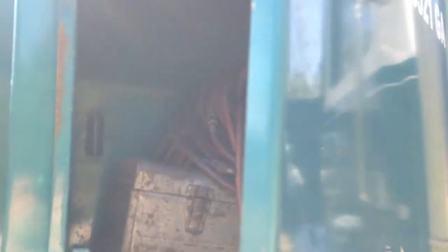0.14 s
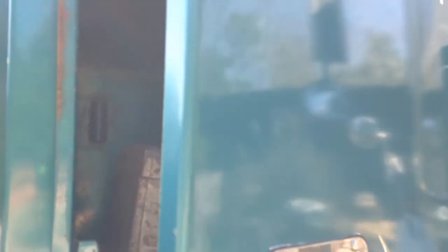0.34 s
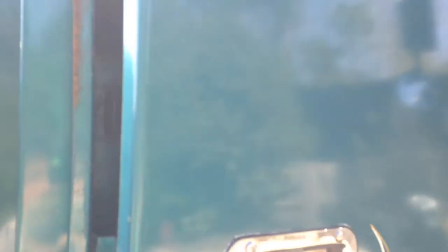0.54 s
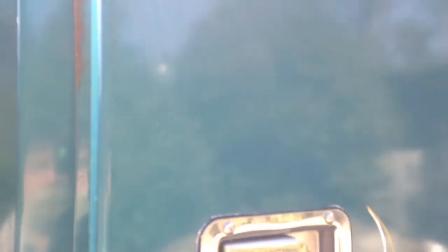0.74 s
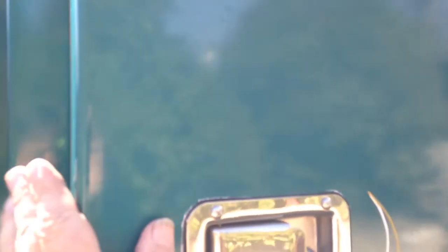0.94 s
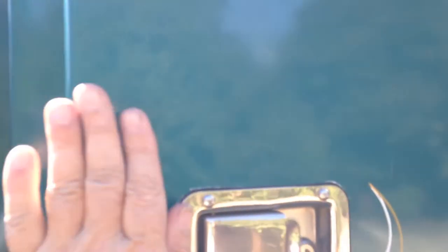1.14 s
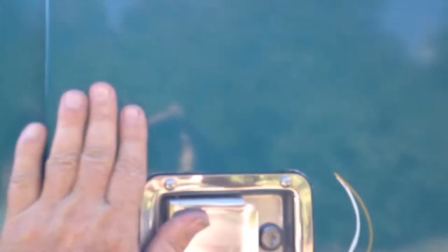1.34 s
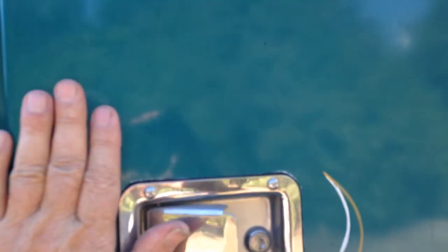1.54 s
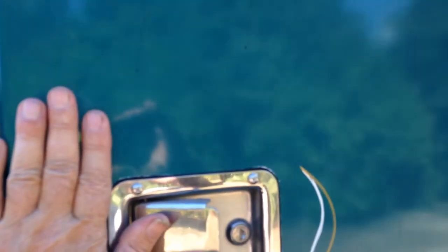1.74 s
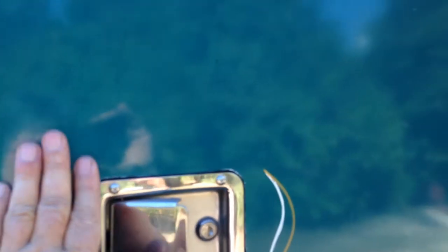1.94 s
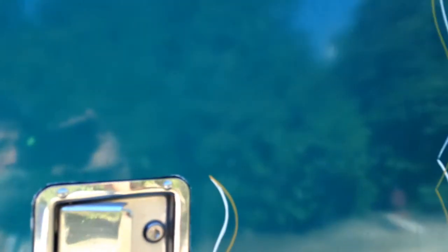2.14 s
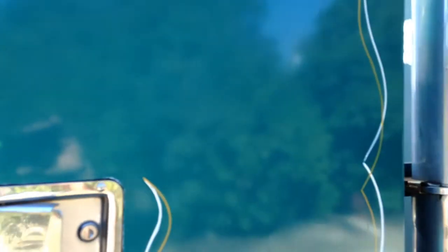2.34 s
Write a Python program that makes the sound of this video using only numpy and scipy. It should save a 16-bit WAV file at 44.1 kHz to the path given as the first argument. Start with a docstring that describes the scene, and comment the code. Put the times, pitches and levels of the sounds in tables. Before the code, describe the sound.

Metal compartment door on a truck slams shut: sharp knock, brief latch squeal, heavy hollow bang

```python
"""Outdoors, close to a truck, a steel compartment door is pushed shut by hand over faint shaped noise.
It comes free with a sharp knock and a smaller tick; grainy noise swells tick and rub as it swings and after.
The latch bolt squeals over its striker in two unsteady tones with overtones and combination tones.
The slam is a quick run of blows: bursts of decaying noise for the steel box's boom and long rumble,
with decaying sines for its panels and bolt."""
import sys
import numpy as np
from scipy import signal
from scipy.fft import rfft, irfft, next_fast_len
from scipy.io import wavfile

SR = 44100
rng = np.random.default_rng(int(sys.argv[2]) if len(sys.argv) > 2 else 0)


def file_out(sig):
    """Save sig as 16-bit WAV at sys.argv[1]."""
    # one column per channel
    cols = np.atleast_2d(sig).T
    # limit, then scale
    lim = np.clip(cols, -1, 1)
    pcm = np.round(lim * 32767).astype(np.int16)
    wavfile.write(sys.argv[1], SR, pcm)


N = 109323
TIME = np.arange(N) / SR
STEP = 16   # noise levels are set every STEP samples
SLOW_TIME = TIME[::STEP]
BANDS_HZ = 31.25 * 2 ** (np.arange(28) / 3)   # third-octave centres
ATTACK_S = 0.00074


def from_db(db):
    """Level to amplitude: 20 dB is a factor of ten."""
    return 10 ** (np.asarray(db) / 20)


def rms_one(x):
    """Normalisation: scale to unit mean power."""
    return x / np.sqrt(np.mean(x ** 2) + 1e-20)


def per_band(rows):
    """Spectral interpolation: columns of a frequency table read at the band centres on a log axis."""
    hz, *columns = np.transpose(rows)
    return [np.interp(np.log(BANDS_HZ), np.log(hz), column)[:, None] for column in columns]


def smooth_chance(chance, pole):
    """Low-pass filtering: a double pole smooths a random sequence."""
    return signal.lfilter([1], [1, -2 * pole, pole * pole], chance)


def drift(hz):
    """Random modulation: low-passed chance of unit RMS, with its corner near hz."""
    pole = np.exp(-2 * np.pi * hz * STEP / SR)
    slow = smooth_chance(rng.standard_normal(2 * len(SLOW_TIME)), pole)
    settled = slow[len(SLOW_TIME):]
    return np.interp(TIME, SLOW_TIME, rms_one(settled))


def dying(age, t60):
    """Exponential damping: 60 dB down after t60 seconds, held at 120 dB down."""
    return np.exp(-np.log(1000) * np.minimum(age / t60, 2))


def ring(modes, start):
    """Modal superposition: one blow starts damped sines, each with a pitch, peak dB and t60."""
    age = TIME[:N - int(start * SR)]
    out = sum(from_db(db) * np.sin(2 * np.pi * hz * age) * dying(age, t60) for hz, db, t60 in modes)
    return np.pad(out, (N - len(age), 0))


def shaped_noise(power, ripple_db=0):
    """Filtered noise: third-octave bands follow a power, coloured by cavity and narrow resonances."""
    # Resonances of the open steel box, colouring the noise within each band.
    # Each row: centre in Hz, half-width in Hz, boost in dB.
    cavity = [(38, 6.6, 8.5), (72.2, 7, 9.5), (98, 8, 6), (152, 4.5, 7), (189, 6.6, 8), (216, 6.6, 9),
              (342.9, 71, 5), (434, 6.7, 3.5), (507.7, 24, 8.5), (571.2, 8.9, 6.5), (669.6, 32, 8),
              (1200, 35, 4), (1279, 19, 3.5), (1884, 9.5, 5.5), (1890, 18, 4), (2850, 130, 2),
              (5270, 250, 1), (6900, 720, 1.5)]
    ripple_width_hz = 30
    size = next_fast_len(N + SR // 4)   # the extra lead lets the filters settle
    hz = np.fft.rfftfreq(size, 1 / SR)
    # steel rings more at some pitches than at others, fully so above 1 kHz
    chance = rng.standard_normal(len(hz))
    ripple = rms_one(smooth_chance(chance, np.exp(-hz[1] / ripple_width_hz)))
    ripple = ripple * np.minimum(hz / 1000, 1)
    cavity_db = sum(db / (1 + ((hz - centre) / width) ** 2) for centre, width, db in cavity)
    spectra = rfft(rng.standard_normal((2, size)))
    coloured = irfft(spectra * from_db(cavity_db + ripple_db * ripple), size)
    edge = 2 ** (1 / 6)
    out = np.zeros(N)
    for k, centre in enumerate(BANDS_HZ):
        band_pass = signal.butter(2, [centre / edge, centre * edge], "band", fs=SR, output="sos")
        band = signal.sosfilt(band_pass, coloured[k % 2])[-N:]   # neighbours use separate noises
        out += band * np.repeat(np.sqrt(power[k]) / band.std(), STEP)[:N]
    return out


def clatter(power):
    """High modal density: rippled noise for steel, flickering in level as loose parts rattle."""
    ripple_db, clatter_db, clatter_hz = 2.5, 0.5, 111
    return shaped_noise(power, ripple_db) * from_db(clatter_db * drift(clatter_hz))


def blow_power(blow, rings, attack_s):
    """Impact excitation: a crack and decaying rings set each band's power; the lows rise later."""
    # Where a blow's colour is set: bass up to the first, middle at the second, treble from the third, in Hz.
    colour_hz = [1000, 1200, 4000]
    crack_t60_s, attack_cycles = 0.04, .6
    start, *colour_db, crack_db = blow
    age = SLOW_TIME[SLOW_TIME > start] - start
    strength_db, = per_band(list(zip(colour_hz, colour_db)))
    # the crack takes the first ring's spectrum
    crack = from_db(per_band(rings[0])[0] + crack_db) * dying(age, crack_t60_s)
    decay = crack ** 2
    for db, t60 in map(per_band, rings):
        decay = decay + (from_db(db) * dying(age, t60)) ** 2
    rise = 1 - np.exp(-age / (attack_s + attack_cycles / BANDS_HZ[:, None]))
    power = decay * (from_db(strength_db) * rise) ** 2
    return np.pad(power, ((0, 0), (len(SLOW_TIME) - len(age), 0)))


def air():
    """Broadband background: faint shaped noise whose lows and treble change level separately."""
    # Basic spectrum. Each row: frequency in Hz, third-octave level in dB before the level changes.
    spectrum = [(30, -88.5), (70, -74.5), (120, -73), (230, -77), (350, -69), (520, -78), (850, -75.5),
                (1300, -73.5), (1900, -77.5), (2800, -76.5), (4200, -79), (6800, -76.5), (10000, -83),
                (15000, -79)]
    # Level changes. Each row: time in seconds, change in dB of the lows, change in dB of the treble.
    changes = [(0, 12, 14), (.15, 12.5, 7), (.33, 13, 2.5), (.6, 2.5, 9), (.8, 1, 8), (1.05, -4, 5.5),
               (1.2, 2, -1.5), (1.33, 7, 10), (1.6, 7.5, 4), (1.7, 5, -10), (1.95, -10, -2), (2.15, 6, -10),
               (2.3, 12.5, -3), (2.48, 8.5, -4.5)]
    split_hz = 3200
    s, low_db, high_db = np.transpose(changes)
    treble = (1 / (1 + (split_hz / BANDS_HZ) ** 2))[:, None]
    low_change_db = (1 - treble) * np.interp(SLOW_TIME, s, low_db)
    high_change_db = treble * np.interp(SLOW_TIME, s, high_db)
    level_db = per_band(spectrum)[0] + low_change_db + high_change_db
    return shaped_noise(from_db(level_db) ** 2)


def rubs():
    """Sliding friction: brief grainy noise swells, Gaussian in time and in log frequency."""
    # Hinge ticks, hand rubs and the door's low shove. Each row: peak time in seconds, level in dB
    # before the grain, rise in seconds, fall in seconds, centre in Hz, width in octaves.
    touches = [(.103, -43.5, 0.0068, 0.016, 10900, 1.2), (0.194, -40, 0.01, 0.0096, 2670, 0.83),
               (.47, -52, 0.019, 0.011, 3020, 0.75), (.615, -54, 0.0024, 0.01, 6500, 0.17),
               (.652, -55.5, 0.0044, 0.03, 4660, 0.63), (0.776, -50, 0.0042, .015, 3900, 0.83),
               (.86, -54.5, .008, 0.0074, 7360, 0.86), (0.9409, -49.5, .0012, 0.0032, 1184, 0.13),
               (.963, -54, .002, .003, 8500, .6), (0.975, -53.5, 0.00055, 0.019, 6000, 0.68),
               (1.072, -58, .001, 0.0091, 9100, 0.67), (1.135, -58.5, 0.0045, 0.01, 3420, 1.8),
               (1.262, -59, 0.019, 0.013, 9500, 0.4), (1.286, -53.5, 0.0053, .006, 9400, 0.3),
               (1.426, -31, 0.0064, .02, 129.6, 0.65), (1.737, -64.5, .002, 0.0036, 7800, .8),
               (2.09, -59.5, 0.044, 0.021, 12000, 0.51)]
    grain_db, grain_hz = 3, 259
    power = 0
    for peak_s, db, rise_s, fall_s, centre_hz, octaves in touches:
        colour = np.exp(-.5 * (np.log2(BANDS_HZ / centre_hz) / octaves) ** 2)
        distance = np.maximum((peak_s - SLOW_TIME) / rise_s, (SLOW_TIME - peak_s) / fall_s)
        swell = np.exp(-np.minimum(distance ** 2, 20))
        power = power + np.outer(colour / colour.sum(), from_db(db) ** 2 * swell)
    return shaped_noise(power) * from_db(grain_db * drift(grain_hz))


def squeal_tone(rows):
    """Stick-slip oscillation: phase and gain of one tone, unsteady in pitch and level."""
    jitter, flutter_db, flutter_hz = 0.0029, 1, 251.7   # jitter is a fraction of the pitch
    s, hz, db = np.transpose(rows)
    pitch = np.interp(TIME, s, hz) * (1 + jitter * drift(flutter_hz))
    phase = 2 * np.pi * np.cumsum(pitch) / SR
    gain = from_db(np.interp(TIME, s, db) + flutter_db * drift(flutter_hz))
    sounding = (TIME > s[0]) * (TIME < s[-1])
    return phase, gain * sounding


def squeal():
    """Stick-slip and intermodulation: the bolt's two tones, their combination tones and a scrape."""
    # The two tones. Each row: time in seconds, pitch in Hz, level in dB before flutter and mix.
    high_tone = [(1.30, 3800, -72), (1.333, 3700, -65), (1.348, 3780, -47.5), (1.367, 3780, -33),
                 (1.385, 3810, -33.5), (1.392, 3610, -32), (1.402, 3616, -25), (1.418, 3630, -30.5),
                 (1.428, 3570, -54.5)]
    low_tone = [(1.365, 2786, -66), (1.375, 2850, -40), (1.385, 2720, -41), (1.392, 2730, -26),
                (1.402, 2700, -29), (1.412, 2560, -34.5), (1.419, 2698, -26.5), (1.429, 2485, -38.5)]
    # Partials. Each row: multiple of the high tone, multiple of the low tone.
    multiples = [(1, 0), (0, 1), (2, 0), (0, 2), (1, 1), (2, -1), (-1, 2), (1, 2), (2, 1), (0, 3), (3, 0),
                 (1, 3), (2, 2)]
    # Level of each partial, in dB relative to its tone (to the weaker one where both mix).
    partial_db = [-1.5, -1.5, -9, -12, -6, -15, -23, -12.5, -17.5, -19, -26, -22.5, -19.5]
    scrape_db = -11.5
    high, high_gain = squeal_tone(high_tone)
    low, low_gain = squeal_tone(low_tone)
    out = from_db(scrape_db) * low_gain * rng.standard_normal(N)
    for (m, n), db in zip(multiples, partial_db):
        if m and n:
            gain = np.minimum(high_gain, low_gain)
        else:
            gain = high_gain if m else low_gain
        out = out + np.sqrt(2) * from_db(db) * gain * np.sin(m * high + n * low)   # levels are RMS
    return out


def knocks():
    """Impact and reverberation: a steel knock echoes in the open box, then a smaller tick."""
    # The door coming free. Each row: start in seconds, then bass, middle, treble and crack in dB.
    blows = [(.0592, 2, 4, 6, 8), (.2168, 6, 7.5, -1, -5)]
    # The knock's dense ring, its echo in the box and the tick's narrower ring.
    # Each row: frequency in Hz, third-octave level in dB before the blow's colour, t60 in seconds.
    knock_ring = [(35, -57, 0.2), (102, -45.5, 0.2), (250, -47, .45), (710, -41, 0.34), (1200, -36, 0.093),
                  (1900, -42, .18), (2600, -29.5, 0.21), (3280, -23, 0.12), (4800, -28, 0.12),
                  (6500, -35.5, 0.15), (9560, -40.5, 0.095), (14050, -42, .13)]
    knock_tail = [(35, -75.5, 1), (100, -56.5, 1.8), (240, -56.5, 2.1), (338, -52.5, 1.4), (500, -55, 0.7),
                  (704, -37.5, .9), (970, -54, 0.89), (1300, -50, 1.3), (1900, -53.5, .9),
                  (3000, -57, 0.86), (4000, -66, .7), (5200, -51.5, .9), (8000, -70, .6),
                  (13360, -70.5, .5)]
    tick_ring = [(100, -75, .2), (1800, -53, 0.28), (2600, -44.5, 0.31), (3380, -32.5, 0.11),
                 (4200, -44, 0.11), (5280, -29, 0.051), (6340, -74, 0.053), (9000, -75, .05)]
    # Single modes of the knock and of the tick. Each row: pitch in Hz, peak level in dB, t60 in seconds.
    knock_modes = [(680, -36.5, 0.14), (697, -38.5, .4), (780, -42, .22), (1285, -49, 0.9),
                   (1417, -46.5, .8), (2534, -32.5, .2), (2800, -35.5, .2), (3070, -24.5, .12),
                   (3365, -17, 0.094), (3980, -33.5, .13), (4370, -33, 0.21), (4470, -27, .1),
                   (5355, -31, .1), (5980, -32, 0.11)]
    tick_modes = [(2640, -37.5, 0.11), (3020, -41, .18), (3410, -39, 0.12), (4740, -28.5, 0.023),
                  (4940, -32, 0.04), (5700, -41.5, 0.031)]
    knock_attack_s = 0.0018
    knock, tick = blows
    power = blow_power(knock, [knock_ring, knock_tail], knock_attack_s)
    power = power + blow_power(tick, [tick_ring], ATTACK_S)
    return clatter(power) + ring(knock_modes, knock[0]) + ring(tick_modes, tick[0])


def slam():
    """Impact and modal decay: blows shake the steel box, its panels boom and the bolt rings."""
    # Bolt, door on frame, rebound and latch catching.
    # Each row: start in seconds, then bass, middle, treble and crack in dB.
    blows = [(1.429, -7, 2.5, 1.5, 8.5), (1.4495, -0.5, 1.5, 0, 8), (1.469, -1.5, 3, -4, -9.5),
             (1.477, -7, -7, -0.5, -5.5), (1.488, -4.5, -4.5, -6, 11), (1.5116, -5.5, -14.5, -7, 15)]
    # Dense ringing of door and box, and the long rumble after the blows.
    # Each row: frequency in Hz, third-octave level in dB before the blow's colour, t60 in seconds.
    box = [(25, -44, 0.37), (38, -35.5, 0.18), (55, -40.5, .7), (79.85, -44.5, 0.84), (134, -28.5, 1.6),
           (200, -35.5, 0.63), (302, -26, 0.37), (490, -23.5, 0.36), (780, -30.5, 0.5), (1290, -21, 0.21),
           (1898, -27, 0.37), (2800, -26.5, 0.23), (5500, -27, .24), (8260, -28, .2), (12000, -30, .18),
           (14700, -29, 0.14)]
    rumble = [(35, -62.5, 2), (70.6, -47, 1.4), (130, -37.5, 2.1), (288, -43, 2.3), (586, -47, 1.7),
              (1190, -49.5, 1.48), (2477, -65, 0.51), (8050, -81, 0.36)]
    # Single modes of the steel panels: pitches in Hz, peak levels in dB, t60 in seconds.
    panel_hz = [38.5, 70.5, 99, 127, 140, 152, 189, 227, 299, 331, 434, 507, 569, 661, 982, 1046, 1149,
                1200, 1296, 1400, 1603, 1799, 1982, 2095]
    panel_db = [-33, -38, -30, -28, -30.5, -20.5, -27.5, -22.5, -32.5, -38.5, -26.5, -25, -25.5, -37.5, -26,
                -23, -23, -28, -25.5, -29, -32.5, -25, -20.5, -27]
    panel_t60_s = [.7, 6.1, 1.7, 2.1, 1.9, 1.25, 1.2, .8, 1.2, 0.89, .5, .45, .42, 0.93, 0.39, 0.28, .62,
                   .46, .36, 0.64, .62, .28, 0.44, .2]
    # Ring of the catching latch bolt. Each row: pitch in Hz, peak level in dB, t60 in seconds.
    bolt = [(2790, -37, .15), (3750, -41.5, 0.42), (4950, -36.5, 0.27), (5150, -26, 0.12),
            (7060, -34, 0.087), (7860, -16.5, 0.078), (10600, -30.5, .06), (11930, -25.5, .07)]
    landing_s, catch_s = 1.4555, 1.5105
    power = sum(blow_power(blow, [box, rumble], ATTACK_S) for blow in blows)
    panels = ring(zip(panel_hz, panel_db, panel_t60_s), landing_s)
    return clatter(power) + panels + ring(bolt, catch_s)


def scene():
    """Superposition: all sources add at one close microphone."""
    return (air() + rubs() + squeal() + knocks() + slam())[None]


def record(dry):
    """Band limiting and saturation: deepest bass thinned, peaks rounded, top cut."""
    low_cut_hz, cutoff_hz, overload = 26, 15300, .8   # overload is the amplitude ceiling
    high_pass = signal.butter(2, low_cut_hz, "high", fs=SR, output="sos")
    thinned = signal.sosfilt(high_pass, dry)
    rounded = overload * np.tanh(thinned / overload)
    low_pass = signal.ellip(12, .1, 80, cutoff_hz, fs=SR, output="sos")
    return signal.sosfilt(low_pass, rounded)


dry = scene()
out = record(dry)
file_out(out)
```